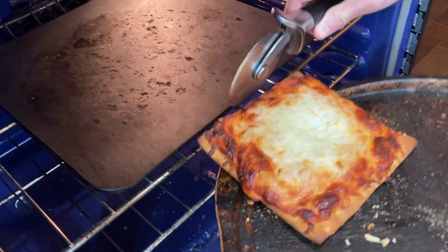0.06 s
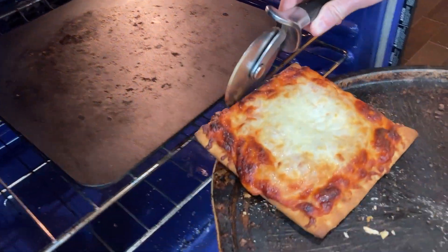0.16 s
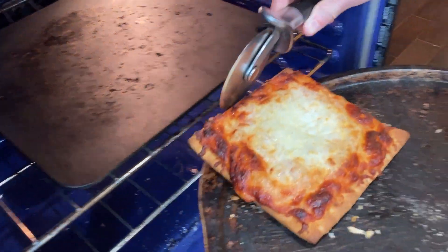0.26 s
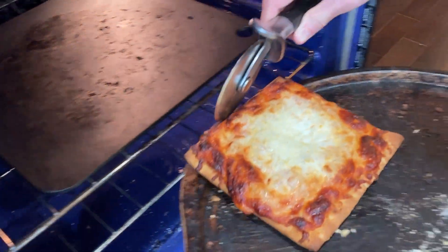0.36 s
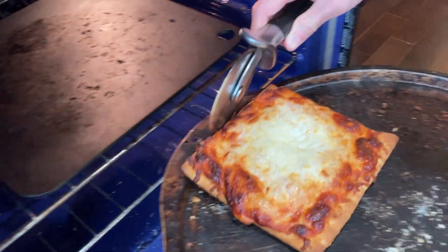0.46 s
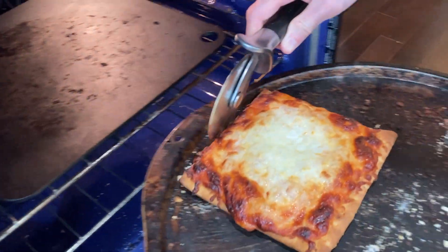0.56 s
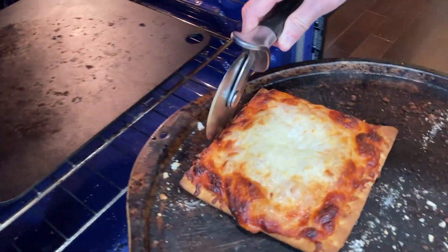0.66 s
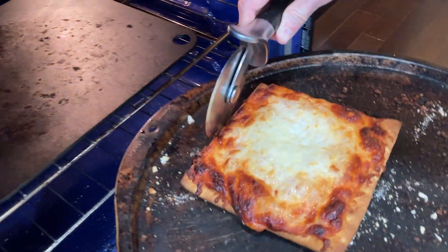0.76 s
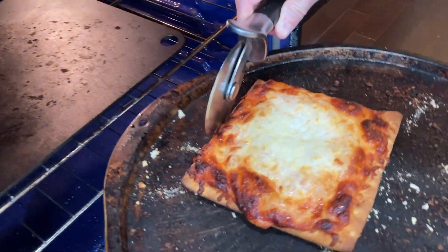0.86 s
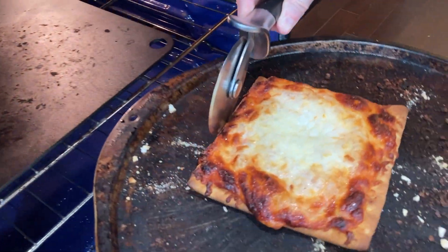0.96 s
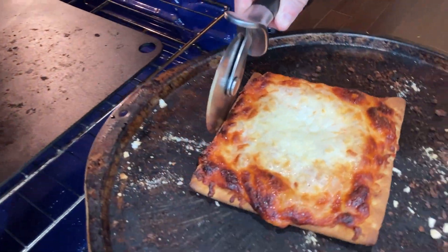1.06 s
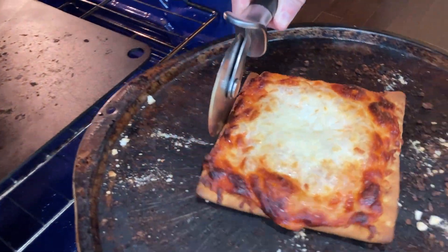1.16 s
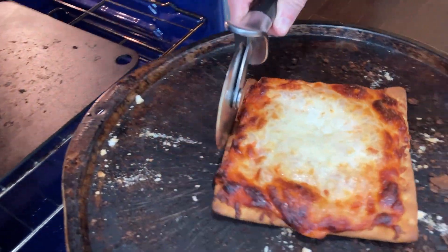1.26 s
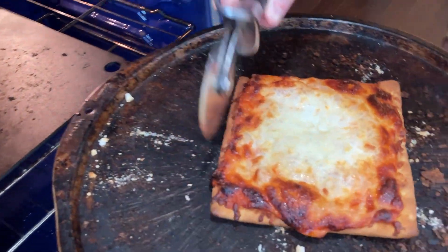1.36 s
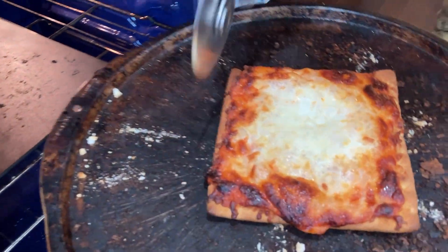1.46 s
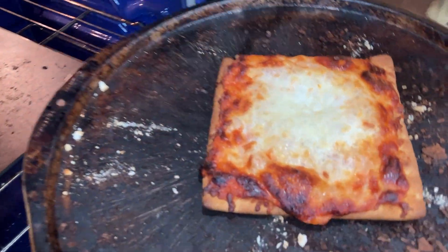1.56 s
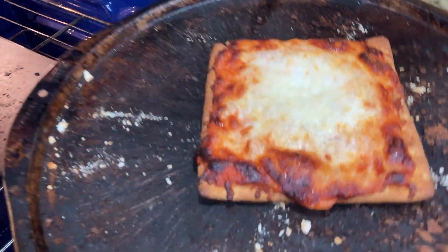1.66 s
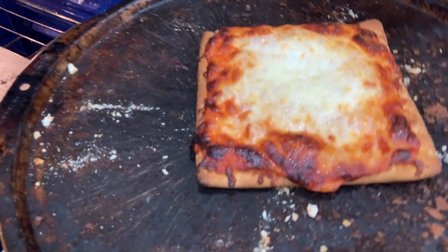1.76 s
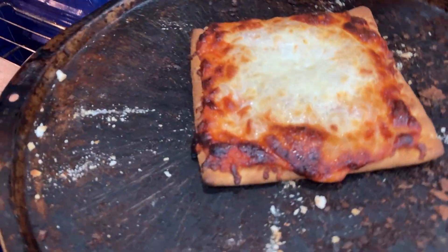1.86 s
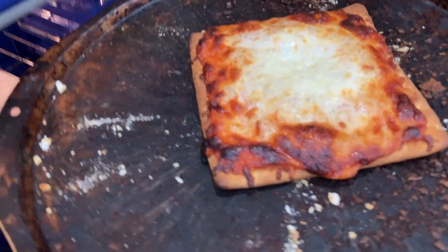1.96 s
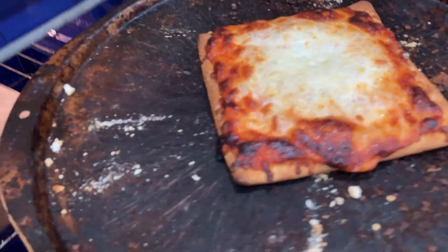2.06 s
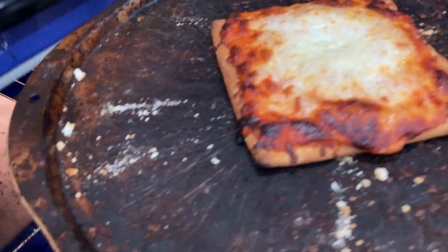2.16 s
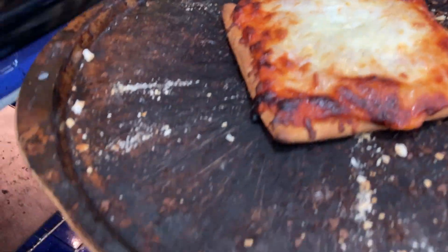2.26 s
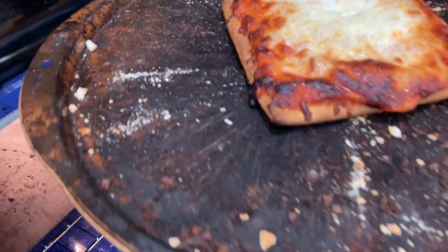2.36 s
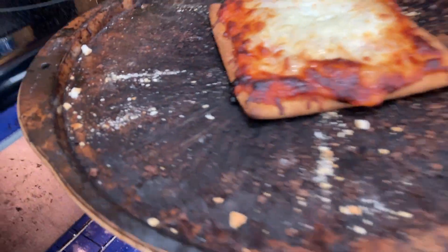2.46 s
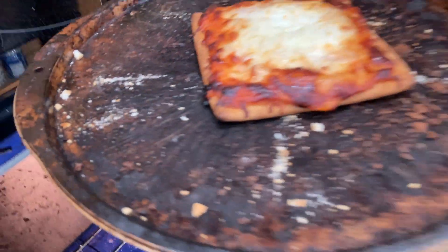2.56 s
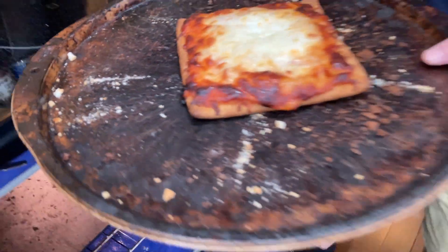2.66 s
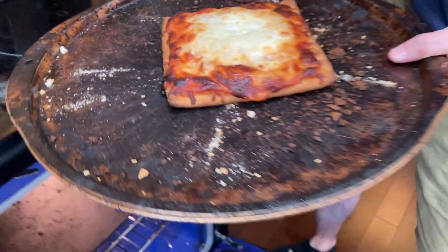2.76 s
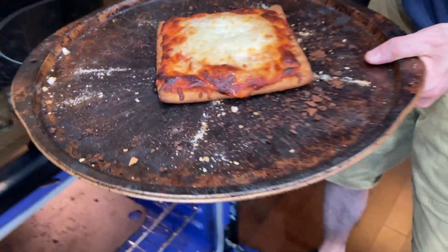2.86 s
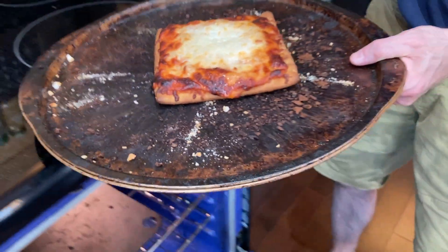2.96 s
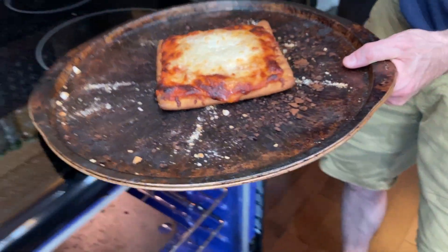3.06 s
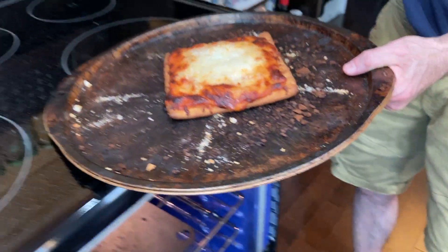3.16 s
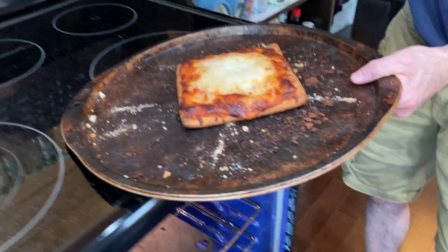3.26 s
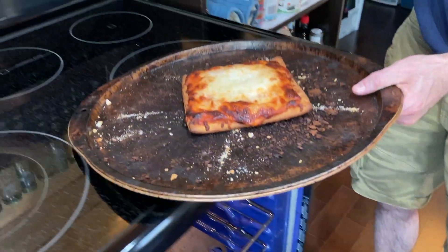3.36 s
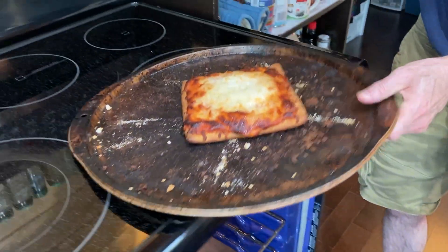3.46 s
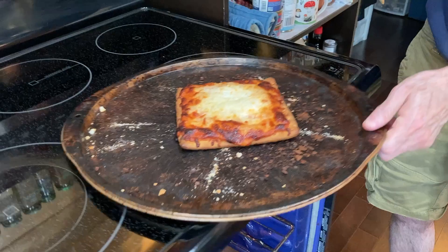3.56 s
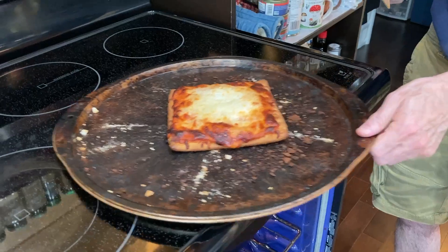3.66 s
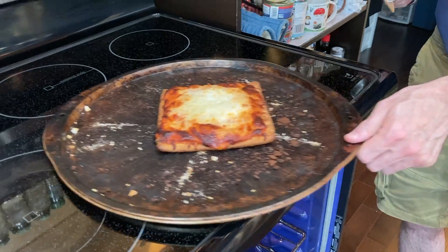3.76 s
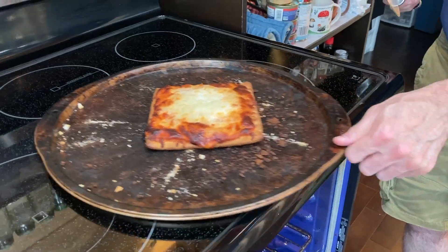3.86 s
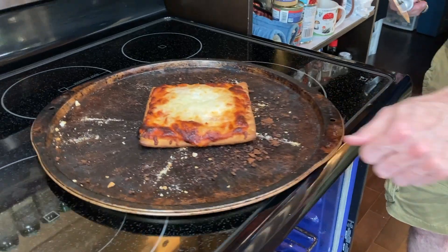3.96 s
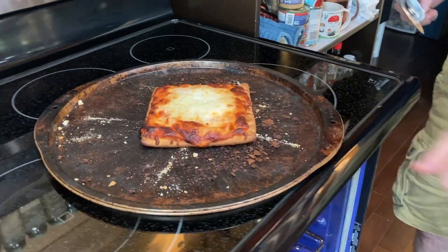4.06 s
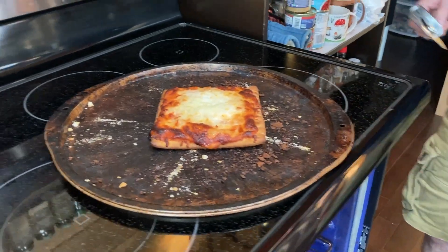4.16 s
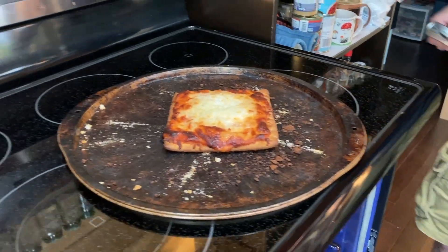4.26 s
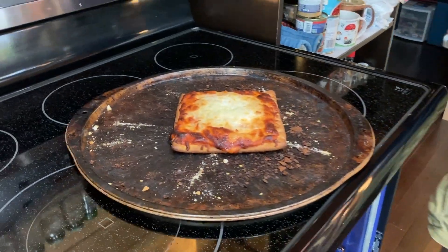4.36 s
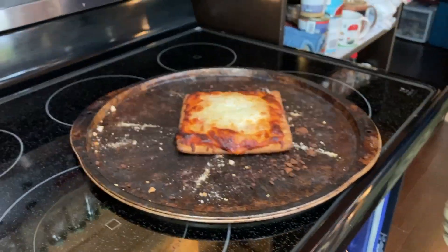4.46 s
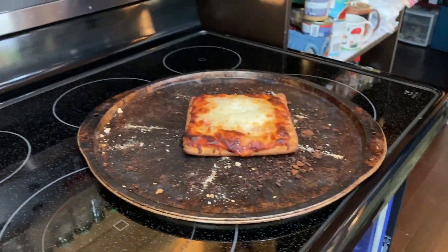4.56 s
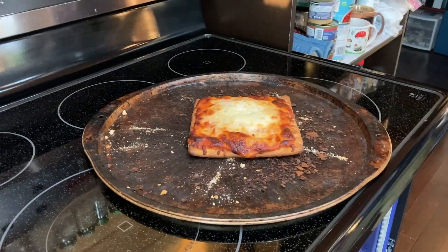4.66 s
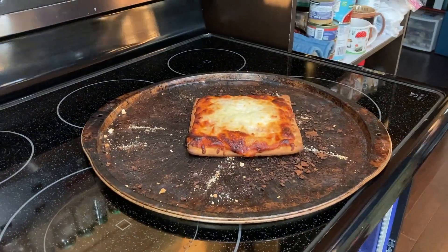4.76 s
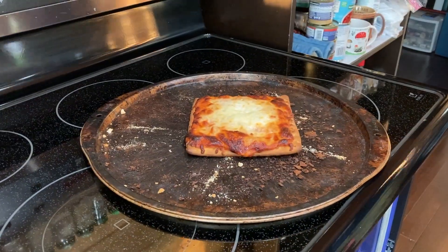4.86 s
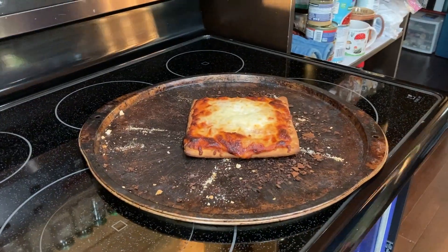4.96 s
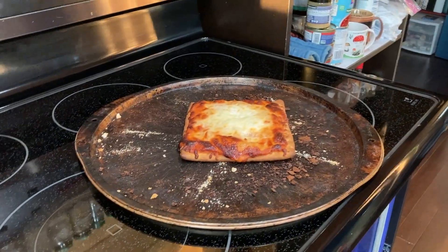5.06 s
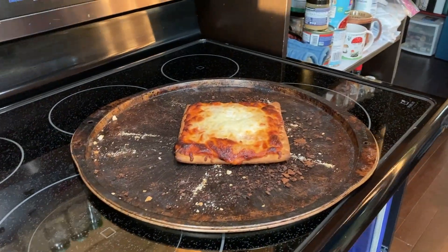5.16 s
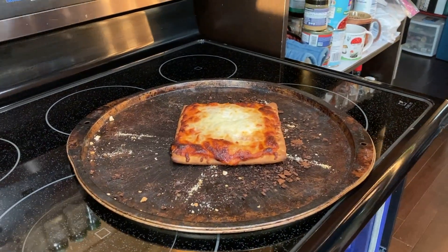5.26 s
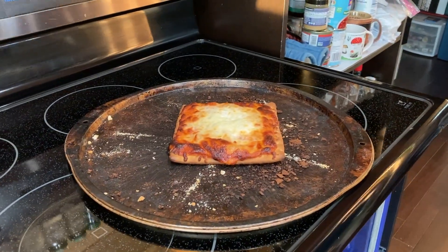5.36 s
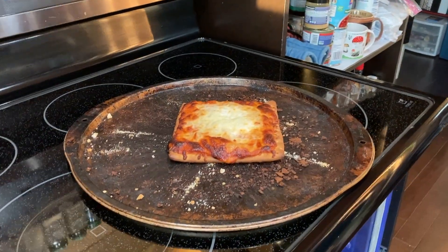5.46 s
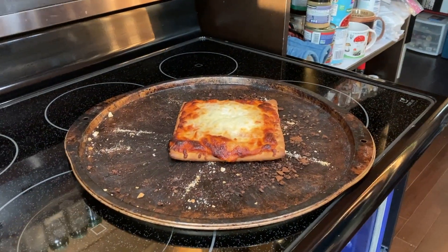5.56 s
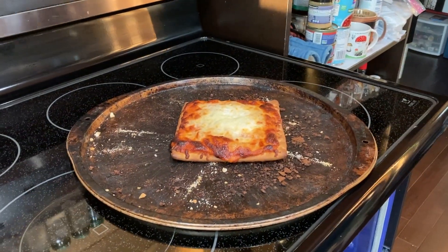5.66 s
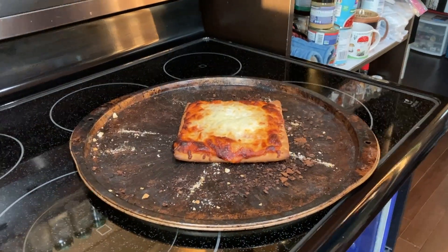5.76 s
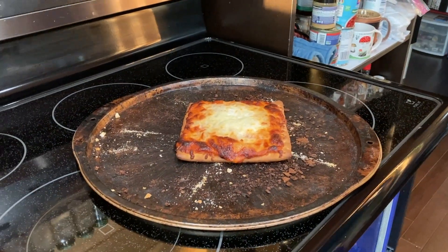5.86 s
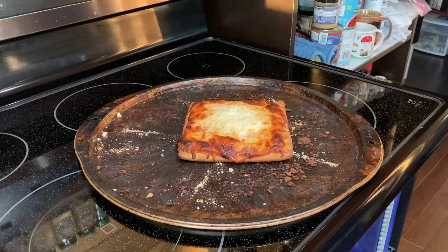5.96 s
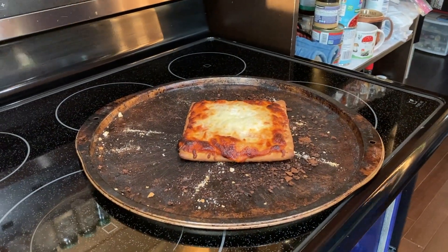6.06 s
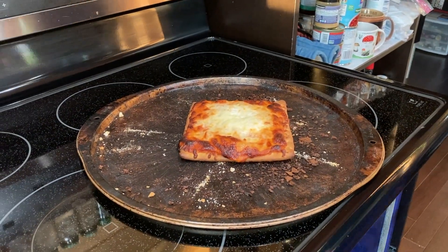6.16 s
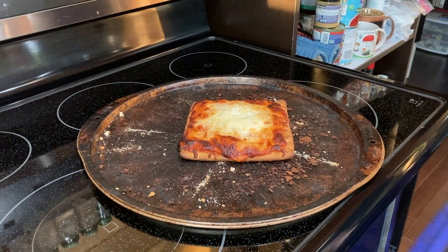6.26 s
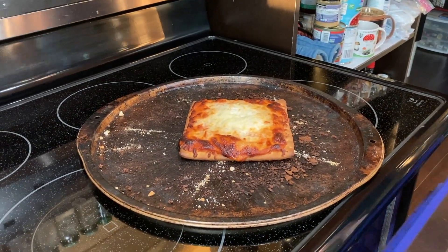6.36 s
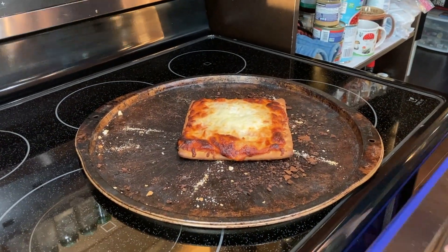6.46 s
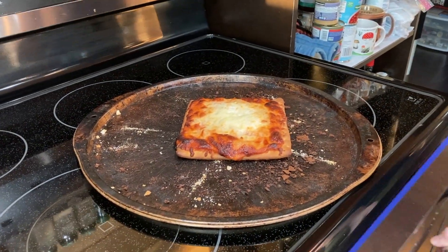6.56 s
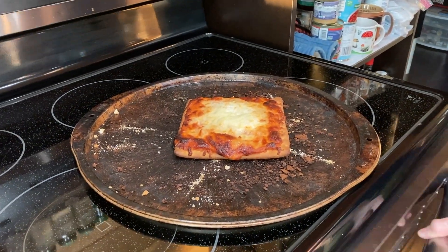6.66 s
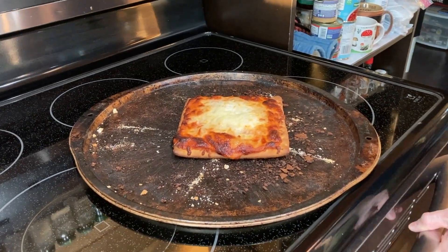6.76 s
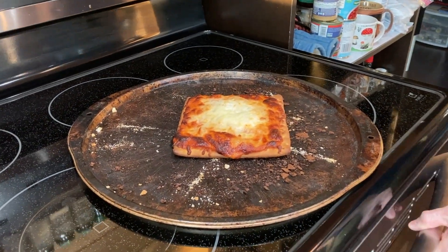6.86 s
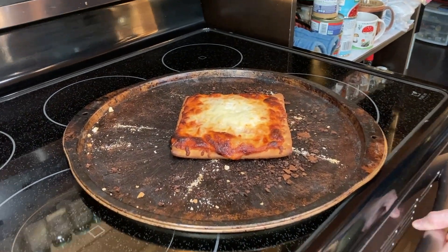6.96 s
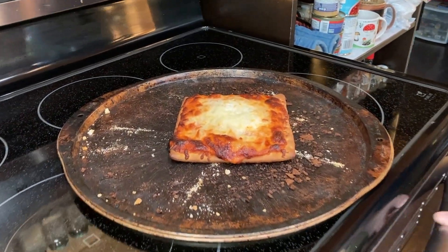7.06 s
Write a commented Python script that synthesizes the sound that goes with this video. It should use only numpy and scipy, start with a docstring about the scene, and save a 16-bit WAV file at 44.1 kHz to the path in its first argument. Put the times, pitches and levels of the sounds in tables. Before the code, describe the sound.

Dry, crackly dragging on ringing sheet metal stops; after tiny ticks comes a sharp metallic clunk, a brief rattle, soft thumps and light door taps.

```python
"""In a home kitchen with a low hum, a crisp pizza is dragged with a cutter wheel onto a thin metal pan.
The drag is dense random clicks, coloured by the crust and ringing in the pan; lone metal tones sing on.
The cheese ticks as it cools (short high sines), then the cutter is laid down with a clunk of struck modes.
The pan slides and rattles on a glass hob, feet thump and an oven door is shut: noise bursts and ringing modes.
Two close microphone ports hear it, with echoes of the kitchen on the close sounds."""
import sys
import numpy as np
from scipy import signal
from scipy.fft import rfft, irfft, next_fast_len
from scipy.io import wavfile

SR = 44100
rng = np.random.default_rng(int(sys.argv[2]) if len(sys.argv) > 2 else 0)


def wav_record(signal):
    """Record a signal, one row per channel, as 16-bit PCM in the file named by sys.argv[1]."""
    frames = np.transpose(np.atleast_2d(signal))
    bounded = np.clip(frames, -1, 1)
    # unit amplitude maps onto the largest positive 16-bit level
    quanta = np.round(bounded * 32767).astype(np.int16)
    wavfile.write(sys.argv[1], SR, quanta)


N = 314080

# natural tones of the thin pan: pitch_hz, level_db, t60_s (time to die by 60 dB)
PAN_MODES = [(185.6, -9, 0.025), (327.7, 10.5, 0.056), (421, 6.5, 0.075), (487, 1, 0.15), (551, 3, 0.11),
             (586, -14.5, 0.35), (696, 0, 0.14), (833, -4.5, 0.077), (1034, -5.5, 0.08), (1019, -9, 0.081),
             (1221, -6.5, 0.22), (1393, -7.5, 0.17), (1583, -10.5, 0.064), (1749, -4, 0.13),
             (1860, -9.5, 0.087), (2045, -5, 0.15), (2335, -14.5, 0.057), (2506, -8.5, 0.11),
             (2686, -22, 0.07), (3574, -7.5, .08), (4010, -9, 0.098), (4683, -10, 0.14)]
# the pan is knocked and rocks, and at 3.15 s the cutter lands: start_s, noise_db (strength around 1500 Hz),
# treble_db (6000 Hz against 1500 Hz), # t60_s (noise, at 1000 Hz), ringing_db, ringing_centre_hz
PAN_BLOWS = [(0.119, -39, -39, 0.21, -41, 325), (0.271, -40.5, 4, 0.84, -46, 1500),
             (3.15, -4.5, -14, 0.092, -24, 416), (3.446, -51, -25, 0.072, -38.5, 556),
             (3.473, -44, -12, 0.57, -35.5, 555), (3.547, -45, 1, 1, -40, 490),
             (3.593, -20.5, -6, 0.065, -36, 277), (3.622, -27, -19, 0.091, -33.5, 400),
             (3.758, -19.5, -7.5, 0.064, -41, 1090), (3.841, -49, 0.5, 0.86, -36.5, 395),
             (3.862, -60, -3, .1, -53, 460), (3.918, -51.5, -23, 0.18, -38, 387),
             (3.968, -45, -16, 0.28, -46, 670), (4.111, -33.5, -23, 0.15, -52, 1500),
             (4.13, -42.5, -33, 0.42, -45.5, 1700)]
# knocks of door and fittings: start_s, noise_db (strength around 1500 Hz),
# bass_db (300 Hz against 1500 Hz), treble_db (6000 Hz against 1500 Hz), t60_s (noise, at 1000 Hz)
DOOR_BLOWS = [(2.81, -52, 3, -33, 0.33), (4.804, -53.5, -27, -4.5, 0.33), (4.903, -51.5, -9, -28.5, 0.55),
              (4.942, -40, -4.5, -31, 0.1), (5.058, -52.5, -25, -5.5, 0.47), (5.396, -71, 33.5, 0, 0.33),
              (5.548, -52.5, 8, -40.5, 0.27), (5.736, -53.5, 7, -33, 0.11), (5.852, -34, -3, -12.5, 0.11),
              (5.982, -52.5, 3.5, -15, 0.39), (6.091, -45, -38, -12.5, 0.4),
              (6.167, -33.5, 3.5, -7.5, 0.22), (6.202, -45, 15, -19, 0.2), (6.446, -56, -2.5, -3.5, 0.53),
              (6.728, -56.5, 2.5, -6, 0.55), (6.796, -40.5, 9, 9.5, 0.19)]
RING_RISE_S = 0.0098   # t60 of the gap that a soft contact leaves before the ring is full


def from_db(db):
    """Turn decibels into a gain."""
    return 10 ** (np.asarray(db) / 20)


def rms_one(x):
    """Scale a sound to an rms of one."""
    return x / np.sqrt(np.mean(x ** 2) + 1e-20)


def in_time(rows):
    """Draw straight lines between the rows of a time table, sample by sample."""
    s, *columns = np.transpose(rows)
    return [np.interp(np.arange(N) / SR, s, c) for c in columns]


def at_hz(points, hz):
    """Read a table of level against pitch on a log pitch axis."""
    table_hz, table_db = np.array(points)[:, 0], np.array(points)[:, 1]
    return np.interp(np.log(hz), np.log(table_hz), table_db)


def band(x, low_hz, high_hz):
    """Keep only the pitches between two limits (Butterworth filter)."""
    limits = [low_hz, min(high_hz, .45 * SR)]
    return signal.sosfilt(signal.butter(2, limits, "band", fs=SR, output="sos"), x)


def drift(rate_hz):
    """Smoothed noise wanders around zero with a spread of 1; a higher rate wanders faster."""
    r = np.exp(-80 * np.pi * rate_hz / SR)      # one point per 40 samples
    noise = rng.standard_normal(N // 40 + 2002)
    slow = signal.lfilter([1], [1, -2 * r, r * r], noise)[2000:]
    return np.interp(np.arange(N) / 40, np.arange(len(slow)), rms_one(slow))


def ring(clicks, hz, t60):
    """A resonance: a click of height 1 starts a sine of height 1 that dies away."""
    r, w = from_db(-60 / (t60 * SR)), 2 * np.pi * hz / SR
    return signal.lfilter([0, np.sin(w)], [1, -2 * r * np.cos(w), r * r], clicks + 1e-18)


def grains(per_s, spread_db):
    """Many tiny contacts: random clicks of uneven size and sign, with an rms of one."""
    sizes = from_db(spread_db * np.minimum(rng.exponential(1, N), 5)) * rng.choice([-1, 1], N)
    return rms_one(sizes * (rng.random(N) < per_s / SR))


def pan_body(x, damping, low_hz, high_hz, wander_db):
    """Pan modes in a range: a load shortens them, the moving contact favours now one, now another."""
    modes = [(hz, db, t60) for hz, db, t60 in PAN_MODES if low_hz < hz < high_hz]
    out = 0
    for k, (hz, db, t60) in enumerate(modes):
        favour_db = wander_db * 2.1 * np.tanh(drift(8.1))
        out = out + (-1) ** k * ring(x * from_db(db + favour_db), hz, t60 * damping)
    return rms_one(out)


def room_tone():
    """Steady air noise, shaped in pitch, and an appliance hum of slowly wavering sines."""
    # colour of the air noise: pitch_hz, level_db (per Hz)
    air_colour = [(25, -9), (50, 14), (123, -1.5), (430, -3), (1330, -5), (2600, -12), (5400, -33.5),
                  (8000, -24), (11000, -29.5), (16000, -39)]
    # appliance hum: pitch_hz, level_db (height of the sine, before its wavering)
    hum_tones = [(127.3, -67.5), (62.6, -73.5)]
    air_db = -70
    hz, t = np.fft.rfftfreq(N, 1 / SR) + 1, np.arange(N) / SR
    air = rms_one(irfft(rfft(rng.standard_normal(N)) * from_db(at_hz(air_colour, hz)), N))
    hum = sum(from_db(db + 2 * drift(5)) * np.sin(2 * np.pi * f * t) for f, db in hum_tones)
    return from_db(air_db) * air + hum


def drag():
    """Crumbs catch and slip: dense grains, coloured by the crust and ringing in the pan."""
    # crust dragged on the pan: start_s, level_db, groan_db (groan of the pan against the level)
    drag_levels = [(0.0, -60, 12), (0.104, -65, -1), (0.12, -51, 8), (0.188, -53, -2), (0.262, -49, 12.5),
                   (0.27, -38.5, -3.5), (0.362, -38, -6), (0.44, -32.5, 0), (0.67, -35.5, -5),
                   (0.702, -31, 0.5), (0.762, -41, -12), (0.9, -32.5, -2), (0.968, -36.5, -1),
                   (1.012, -32.5, -28), (1.038, -36, -2), (1.268, -30, -23), (1.292, -31, -2),
                   (1.45, -85.5, 7)]
    # the crust catches and lets go: start_s, jump_db (sudden change of level)
    crust_catches = [(0.218, 11), (0.387, 10), (0.433, -9), (0.497, 7.5), (0.523, 7), (0.673, 1),
                     (0.706, -9.5), (0.832, 9.5), (0.889, 10), (0.926, 4.5), (1.008, -4), (1.106, 14),
                     (1.162, -4.5), (1.238, 24)]
    # colour of the crust: pitch_hz, level_db (per Hz)
    crust_colour = [(40, -45), (124, -11.5), (340, 5.5), (900, -9.5), (1400, -6), (2300, -19),
                    (2950, -23.5), (4400, -17.5), (7000, -24), (11000, -24), (16000, -33)]
    catch_fade_s = 0.0029   # time for a jump to shrink to about a third
    # a firmer drag is brighter: level in dB when the drag is at -35 dB, and dB per dB of drag level
    treble_db, treble_follows = -43, 1.31
    bass_db, bass_follows = -41, 0.71
    # as more of the pizza lies on the pan the drag darkens; the levels above hold at 0.7 s
    treble_db_per_s, bass_db_per_s = -6.5, 1

    level_db, groan_db = in_time(drag_levels)
    (s, db), jump_db = np.transpose(crust_catches), np.zeros(N)
    jump_db[(s * SR).astype(int)] = db
    jump_db = signal.lfilter([1], [1, -np.exp(-1 / (catch_fade_s * SR))], jump_db + 1e-18)
    rub = grains(6000, 3.1) * from_db(1.3 * drift(55) + jump_db)
    crust_gain = from_db(at_hz(crust_colour, np.fft.rfftfreq(N, 1 / SR) + 1))
    coloured = irfft(rfft(rub) * crust_gain, N)

    middle = rms_one(band(coloured, 550, 3000))
    middle = middle + from_db(-1) * pan_body(rub, .45, 520, 2700, wander_db=3.0)
    bright = rms_one(-band(coloured, 2200, 15400))
    bright = bright + from_db(-7.5) * pan_body(rub, 1.0, 3000, 5000, wander_db=4.0)
    groan = pan_body(rub, 1.0, 250, 520, wander_db=6.0)
    groan = groan + from_db(-7.5) * rms_one(band(coloured, 274, 404))
    bass = rms_one(band(band(coloured, 39, 270), 28, 267))

    firmness_db, later_s = level_db + 35, np.arange(N) / SR - .7
    treble_now_db = treble_db + treble_follows * firmness_db + treble_db_per_s * later_s
    bass_now_db = bass_db + bass_follows * firmness_db + bass_db_per_s * later_s + 2.8 * drift(3.3)
    sound = from_db(level_db) * (rms_one(middle) + from_db(groan_db) * rms_one(groan))
    sound += from_db(treble_now_db) * rms_one(bright * from_db(1.2 * drift(36)))
    sound += from_db(bass_now_db) * bass
    return sound * (np.arange(N) < drag_levels[-1][0] * SR)


def wheel():
    """The steel wheel sings when it lifts off; other lone metal modes ring out as dying sines too."""
    # cutter wheel ringing free: start_s, pitch_hz, level_db, t60_s
    wheel_tones = [(1.316, 7440, -53.5, 0.51)]
    # single metal modes left ringing: start_s, pitch_hz, level_db, t60_s
    lone_tones = [(0.0, 338, -41, 0.84), (0.12, 1510, -53, 0.52), (0.42, 426, -27.5, 0.29),
                  (0.465, 424, -26, .2), (0.512, 436, -25, .1), (1.75, 1410, -69, 0.64),
                  (3.409, 564, -38, 0.11), (3.51, 539, -38, 0.24), (3.461, 1010, -43.5, 0.22),
                  (3.471, 1225, -44, 0.25), (3.475, 1787, -43, 0.27), (3.545, 1700, -39, 0.063),
                  (3.546, 2260, -40.5, 0.08), (3.62, 1820, -29, 0.047), (3.632, 2120, -44, .1),
                  (3.767, 1067, -36, 0.16), (3.84, 1385, -39.5, 0.06), (3.905, 2370, -49, 0.12),
                  (3.95, 737, -47, 0.31), (4.114, 1480, -39, 0.066), (4.12, 2000, -39, 0.094),
                  (4.96, 614, -52.5, 0.22), (6.72, 1200, -59, .1), (6.729, 2070, -56, 0.086),
                  (6.797, 526, -38.5, 0.072), (6.812, 692, -39.5, 0.1), (7.058, 544, -54.5, 1.2)]
    out, t = np.zeros(N + SR), np.arange(SR // 2) / SR
    waver = np.pad(.6 * drift(15), (0, SR))      # phase wander in radians
    for s, hz, db, t60 in wheel_tones + lone_tones:
        i = round(s * SR)
        tone = np.sin(2 * np.pi * hz * t + waver[i:][:len(t)])
        rise = np.clip(t / 0.0032, 0, 1)
        out[i:][:len(t)] += tone * rise * from_db(db - 60 * t / t60)
    return out[:N] * from_db(3 * np.tanh(drift(35)))      # light contact makes the rings flutter


def ticks():
    """Bright snaps are short sines, the harder ones ringing longer, with many fainter clicks between."""
    # small hard ticks: start_s, peak_db, pitch_hz
    snaps = [(1.163, -28.5, 7000), (1.4317, -39, 8900), (1.687, -40, 9100), (1.8195, -47.5, 8000),
             (1.847, -48.5, 7100), (1.919, -47.5, 11600), (1.9654, -47, 11400), (2.013, -47, 11400),
             (2.0607, -41, 11700), (2.5177, -43, 9500), (2.6346, -48, 7460), (2.818, -45.5, 9900),
             (4.308, -58, 7800), (4.353, -52.5, 7000), (5.6264, -54, 7070), (6.797, -28, 7040)]
    out = band(from_db(-83.5) * grains(50, 4.6) + 1e-18, 7400, 15000)
    t = np.arange(900) / SR
    for s, peak_db, hz in snaps:
        t60 = 0.00091 + 0.22 * from_db(peak_db)
        out[round(s * SR):][:len(t)] += np.sin(2 * np.pi * hz * t) * from_db(peak_db - 60 * t / t60)
    return out


def knock_noise():
    """Each knock on pan or door is a burst of noise, built band by band, dying faster in the treble."""
    pan_bass_db = -16.5   # noise at 300 Hz against 1500 Hz: thin metal has little body
    blows = [(s, db, pan_bass_db, treble_db, t60) for s, db, treble_db, t60, *_ in PAN_BLOWS]
    blows += list(DOOR_BLOWS)
    edges_hz = (30 * 2 ** np.arange(0, 9.6, .5))[3:]      # half-octave bands
    out, time = np.zeros(N + SR), np.arange(SR // 2) / SR
    white = rng.standard_normal((2, N + SR))      # neighbouring bands use different noise
    white[:, :N] *= from_db(3 * drift(50))      # loose parts chatter
    for k, (low, high) in enumerate(zip(edges_hz, edges_hz[1:])):
        hz, noise = np.sqrt(low * high), rms_one(band(white[k % 2], low, high))
        for s, mid_db, low_db, high_db, t60 in blows:
            i, t = round(s * SR), time[:round(1.3 * t60 * SR)]
            colour = [(60, low_db - 13.5), (300, low_db), (1500, 0.0057), (6000, high_db),
                      (16000, high_db - 6.5)]
            band_db = mid_db + at_hz(colour, hz) - 13      # share of one band
            band_t60 = t60 * (1000 / hz) ** 0.052
            rise = 1 - np.exp(-t * min(hz, 900) * 0.5)
            shape = rise * from_db(band_db - 60 * t / band_t60)
            out[i:i + len(t)] += shape * (1 - 2 * t) * noise[i:i + len(t)]
    return out[:N]


def pan_rings():
    """Knocks on the pan ring its modes, most strongly those near the knock's own pitch."""
    out, clicks = np.zeros(N), np.zeros(N)
    s, *_, ringing_db, centre_hz = np.transpose(PAN_BLOWS)
    for hz, db, t60 in PAN_MODES:
        near_db = -np.minimum(60 * np.abs(np.log2(hz / centre_hz)), 10)      # far modes are struck weakly
        strike_db = ringing_db + db + near_db + rng.normal(0, 0.9, len(s))
        clicks[np.round(s * SR).astype(int)] = from_db(strike_db)
        out += ring(clicks, hz, min(t60, 130 / hz + .06)) - ring(clicks, hz, RING_RISE_S)
    return out


def thumps():
    """A soft push rings floor and cabinets for a few cycles: a low sine with a fainter one above."""
    # footfalls and dull bumps: start_s, level_db (before the soft rise), pitch_hz, t60_s
    bumps = [(0.518, -29, 116, 0.3), (3.156, -15.5, 180.7, 0.12), (3.198, -24, 195, 0.14),
             (3.502, -42.5, 109, 0.21), (3.632, -29, 82, 0.23), (3.819, -30, 59.6, 0.078),
             (4.035, -40, 77, 0.5), (4.735, -34.5, 68.4, 0.21), (4.928, -45, 41.3, 0.14),
             (5.22, -50.5, 47.9, 0.35), (5.508, -43.5, 49.7, 0.19), (5.548, -33, 52.5, 0.094),
             (5.705, -35.5, 74.7, 0.14), (5.757, -35.5, 54.6, 0.19), (6.177, -41, 135.4, 0.36),
             (6.29, -30, 56.2, 0.12), (6.62, -48.5, 50.2, 0.18), (7.1, -43.5, 77.5, 0.24)]
    out, t = np.zeros(N + SR), np.arange(SR // 2) / SR
    for s, level_db, hz, t60 in bumps:
        wave = np.sin(2 * np.pi * hz * t) + 0.25 * np.sin(2 * np.pi * 1.8 * hz * t)
        rise = 1 - np.exp(-t / 0.0066)
        out[round(s * SR):][:len(t)] += wave * rise * from_db(level_db - 60 * t / t60)
    return out[:N]


def rustle():
    """Fine rubbing of grains, each rub swelling and fading, and a lumpy noise rumble of movement."""
    # level of the rumble of movement: time_s, level_db (before its random wander)
    rumble_levels = [(1.4, -65), (1.62, -69), (2.13, -64), (2.78, -71), (3.17, -65), (3.28, -49.5),
                     (3.79, -46.5), (3.96, -47), (4.3, -64), (4.63, -70), (4.95, -57), (5.3, -69.5),
                     (5.97, -52), (6.2, -54), (6.51, -60.5), (7.12, -57)]
    # slides and brushes of cloth: start_s, length_s, level_db, treble_db (against the level)
    rubs = [(1.66, 1, -67.5, -1.5), (2.107, 0.2, -67.5, -2.5), (3.11, 0.3, -42, -47),
            (3.224, 0.76, -47.5, -12.5), (3.674, 0.57, -51, -8), (4.721, 0.92, -69, -6.5),
            (5.813, 0.21, -56, -19), (6.097, 0.37, -68, -20), (6.79, 0.23, -59, -6.5)]
    rise_share, fall_share = 0.26, 0.66   # shares of the length
    floor_db, treble_floor_db = -77, -80.5   # faint stir between the rubs

    t = np.arange(N) / SR
    middle_gain, treble_gain = from_db(floor_db), from_db(treble_floor_db)
    for s, length, db, treble_db in rubs:
        part = (t - s) / length
        swell = np.clip(np.minimum(part / rise_share, (1 - part) / fall_share), 0, 1) ** 2
        middle_gain = middle_gain + swell * from_db(db)
        treble_gain = treble_gain + swell * from_db(db + treble_db)

    rub = grains(7000, 2.5)
    metal = from_db(2.5) * pan_body(rub, 0.34, 400, 3000, wander_db=4.0)
    body = rms_one(rms_one(band(rub, 250, 2800)) + metal)
    middle = middle_gain * from_db(1.5 * drift(20)) * body
    fine = rms_one(from_db(5.0) * band(rub, 5300, 13000) - band(rub, 2600, 5800))
    fine = fine + from_db(-10.0) * pan_body(rub, .2, 2200, 5000, wander_db=3.0)
    treble = treble_gain * from_db(0.88 * drift(25)) * rms_one(fine)
    rumble_db, = in_time(rumble_levels)
    low_noise = rms_one(band(rng.standard_normal(N), 42, 190))
    rumble = from_db(rumble_db + 2.5 * drift(12)) * low_noise
    return (middle + treble + rumble) * (t > rumble_levels[0][0])


def door_rings():
    """Each knock on the door clatters three times on the panel's modes, unevenly, tilted as its noise is."""
    # natural tones of the door panel: pitch_hz, level_db, t60_s
    panel_modes = [(311, -2.5, 0.033), (434, 2.5, 0.053), (579, -8, 0.079), (940, -21.5, 0.048),
                   (1516, -5.5, 0.058), (1942, 3, 0.052), (2270, 3, 0.059), (2760, 1, 0.035),
                   (3430, -4, 0.075), (4030, 3, 0.05), (4750, -0.5, 0.046)]
    ring_db = -11.5   # ring of the panel against the noise setting
    clatter_s, clatter_loss_db = .018, 6.5   # average gap and loss from touch to touch
    out = 0
    s, db, bass_db, treble_db, _ = np.transpose(DOOR_BLOWS)
    uneven_db = rng.normal(0, 3, (len(s), len(panel_modes), 3))
    late = rng.uniform(.5, 1.5, (len(s), 3)) * [0, 1, 2]      # in gaps after the first touch
    touch_at = np.round((s[:, None] + clatter_s * late) * SR).astype(int)
    for k, (hz, mode_db, mode_t60) in enumerate(panel_modes):
        octaves, clicks = np.log2(hz / 1500), np.zeros(N)
        if octaves < 0:
            tilt_db = bass_db * min(-octaves / 2.3, 1)
        else:
            tilt_db = treble_db * octaves / 2
        first_db = (db + ring_db + mode_db + tilt_db)[:, None]
        touch_db = first_db + uneven_db[:, k] - clatter_loss_db * np.arange(3)
        clicks[touch_at] = from_db(touch_db)
        out = out + ring(clicks, hz, mode_t60) - ring(clicks, hz, RING_RISE_S)
    return out


def clunk():
    """A blow and its bounces strike every mode of cutter and counter; times set how soft each touch is."""
    # cutter laid down, bouncing: start_s, strike_db (strength before softening)
    touches = [(3.1505, -23.5), (3.1543, -10.5), (3.169, -26), (3.205, -16), (3.271, -27)]
    # natural tones of cutter and counter: pitch_hz, level_db, t60_s
    cutter_modes = [(451, -6.5, 0.061), (468.7, -18.5, 0.16), (374, -16, 0.1), (620, -21.5, 0.13),
                    (992.5, -16, 0.16), (1376, -23.5, 0.14), (1608, -13.5, 0.14), (1858, -27, 0.21),
                    (2115, -4.5, 0.14), (1997, -26, 0.2), (2342, -20, 0.2), (2420, -14, 0.19),
                    (2546, -23, 0.18), (2778, -22.5, 0.15), (2848, -13, 0.14), (3430, -24.5, 0.099),
                    (3930, -24, 0.17), (4810, -15, 0.067), (5810, -24.5, .1)]
    out, click = 0, np.zeros(N)
    s, strike_db = np.transpose(touches)
    for k, (hz, db, t60) in enumerate(cutter_modes):
        soft_db = -90 * (s - s[0]) * np.log2(hz / 400)      # later touches are duller
        uneven = np.append(1, rng.uniform(0.7, 1.0, len(s) - 1))
        click[np.round(s * SR).astype(int)] = from_db(strike_db + db + soft_db) * uneven
        out = out + (-1) ** k * ring(click, hz, t60)
    return band(out, 110, 16000)


def hisses():
    """Short thin hisses: smooth swells of very high noise."""
    # start_s, length_s, level_db (at the top of the swell)
    swells = [(5.71, 0.11, -76.5), (7.021, 0.12, -67.5)]
    t = np.arange(N) / SR
    gain = sum(from_db(db) * np.sin(np.pi * np.clip((t - s) / length, 0, 1)) for s, length, db in swells)
    return gain * rms_one(band(rng.standard_normal(N), 11000, 14000))


def kitchen(x):
    """The walls return a dense tail of echoes, made of dying noise that grows duller with time."""
    t60_s = 0.22   # of the lower part; the treble dies half as fast again
    t = np.arange(SR // 2) / SR
    noise = rng.standard_normal(len(t)) * (1 - np.exp(-t / 0.003))
    tail = band(noise, 53, 3900) * from_db(-60 * t / t60_s)
    tail += band(noise, 1600, 12000) * from_db(4.0 - 90 * t / t60_s)
    return signal.fftconvolve(x, tail / np.sqrt(np.sum(tail ** 2)))[:N]


def ports(x, side_table):
    """Left and right differ by a scattered copy; in the treble one port hears the other late and inverted."""
    port_lag_s, port_from_hz = .000222, 6500
    size = next_fast_len(N + SR // 4)
    hz, mid = np.fft.rfftfreq(size, 1 / SR) + 1e-3, rfft(x, size)
    side = mid * from_db(at_hz(side_table, hz))
    for lag_s in rng.uniform(0.00033, 0.012, 5):      # short echo filters scatter phase and ripple the level
        z = np.exp(-2j * np.pi * hz * lag_s)
        side = side * (z - .6) / (1 - 0.28 * z)
    treble_share = .92 / (1 + (port_from_hz / hz) ** 24)
    late = -np.exp(-2j * np.pi * hz * port_lag_s)
    treble = mid * from_db(4.5) * np.array([late, np.ones_like(late)])
    both = mid + side * [[1], [-1]]
    return irfft((1 - treble_share) * both + treble_share * treble, size)[:, :N]


def scene():
    """Close sounds with their echoes, then the background; the cutter lands to the left."""
    # width of the close sounds: pitch_hz, side_db (left-right difference against the middle, before scatter)
    near_width = [(60, -20), (120, -15), (240, -24.5), (480, -16), (950, -11), (1890, -3), (3770, -5),
                  (7520, -1.5), (15000, 8.5)]
    # width of the background: pitch_hz, side_db (likewise)
    far_width = [(60, -14.5), (150, -18.5), (380, -9), (950, -3.5), (2380, -1), (5980, -2), (15000, -10.5)]
    cutter = clunk()
    near = drag() + wheel() + ticks() + knock_noise() + pan_rings() + door_rings() + cutter
    near = near + from_db(-12.0) * kitchen(near)
    background = room_tone() + thumps() + rustle() + hisses()
    close = ports(near, near_width) * from_db([[.3], [-.3]])      # left a little louder
    return close + .15 * cutter * [[1], [-1]] + ports(background, far_width)


def record(dry):
    """Filters cut the lowest bass and the top."""
    dry = signal.sosfilt(signal.butter(2, 32, "high", fs=SR, output="sos"), dry)
    # from 16700 Hz up, everything is at least 70 dB down
    return signal.sosfilt(signal.cheby2(14, 70, 16700, fs=SR, output="sos"), dry)


dry = scene()
out = record(dry)
wav_record(out)
```